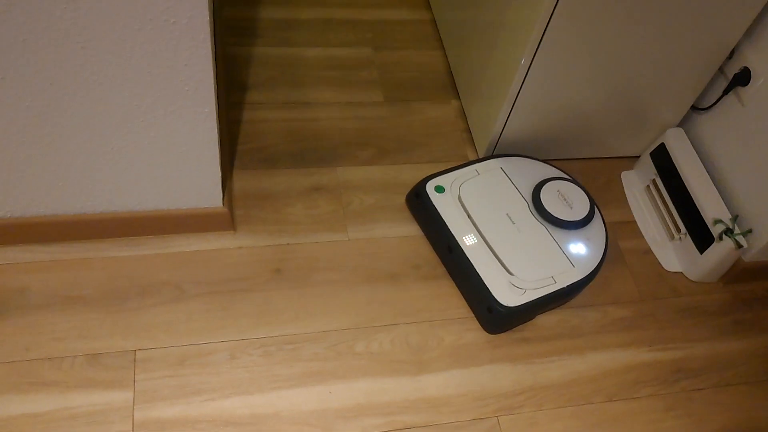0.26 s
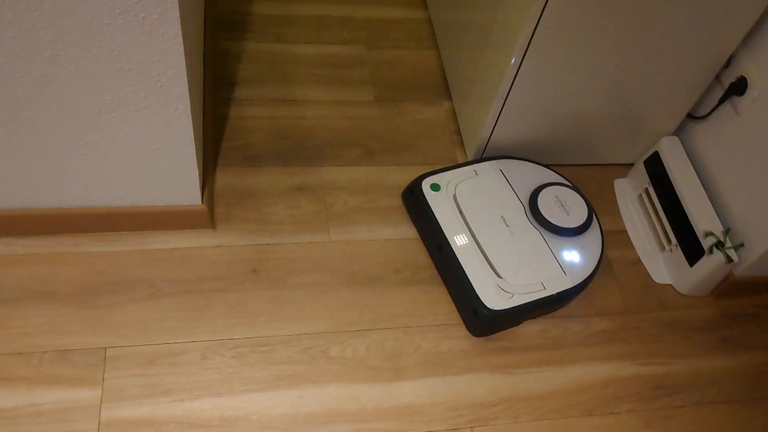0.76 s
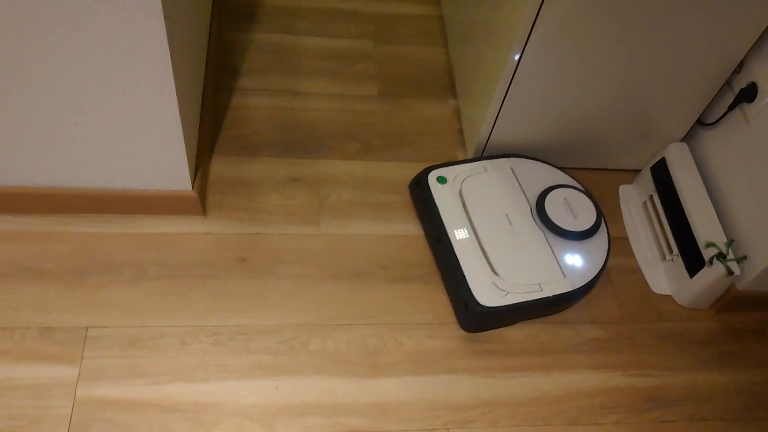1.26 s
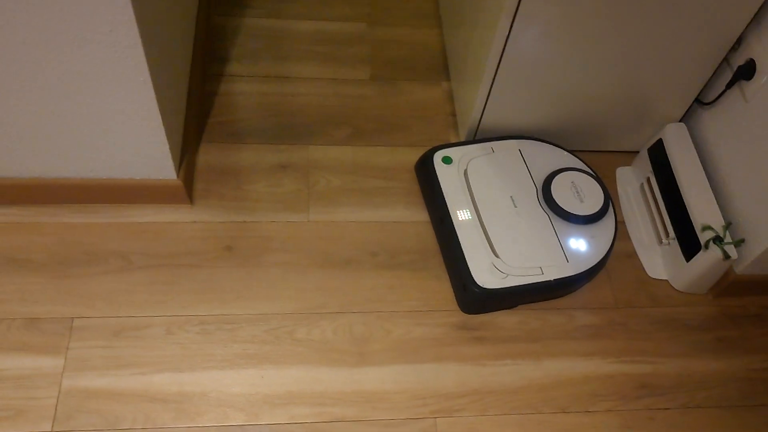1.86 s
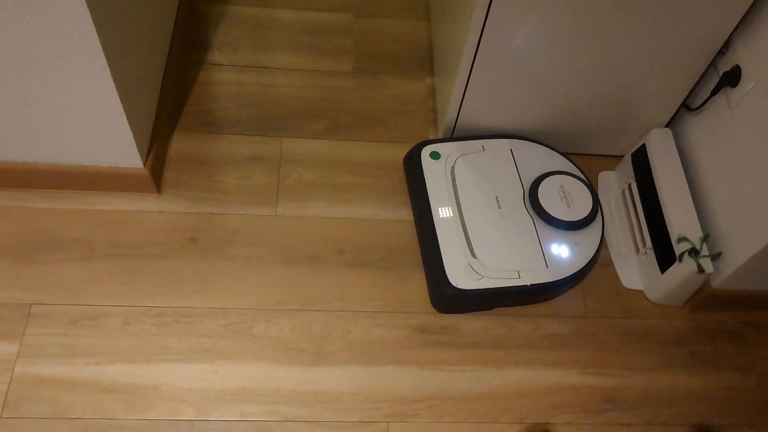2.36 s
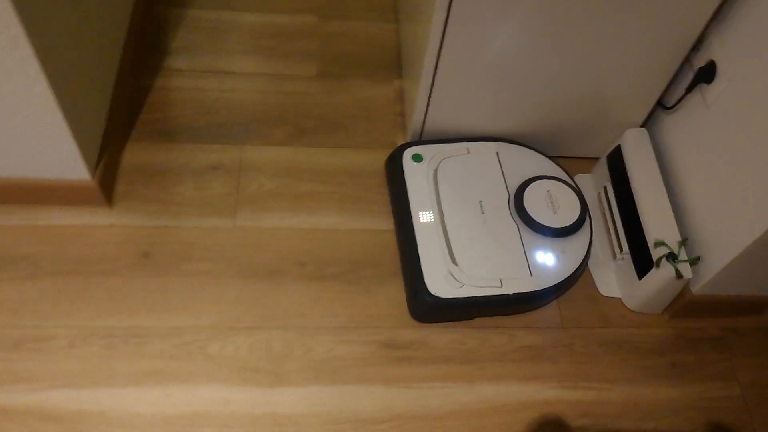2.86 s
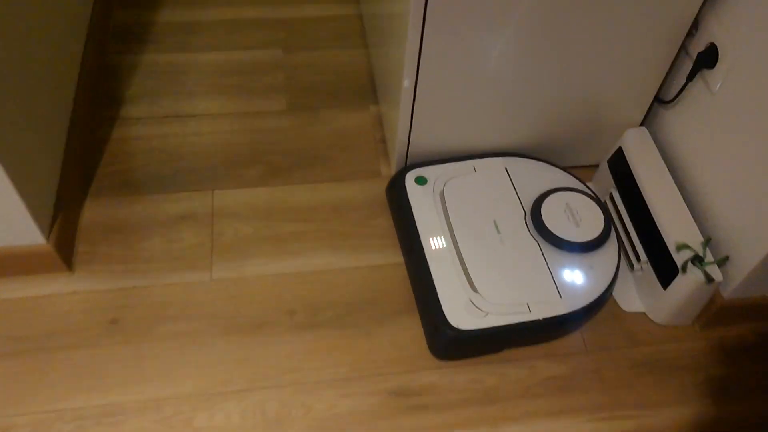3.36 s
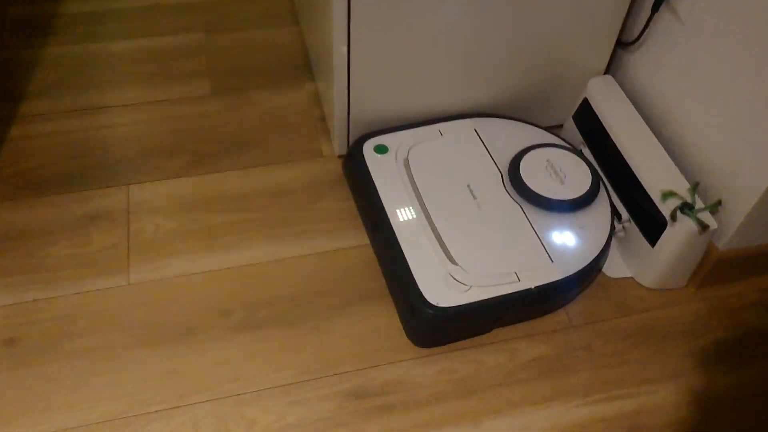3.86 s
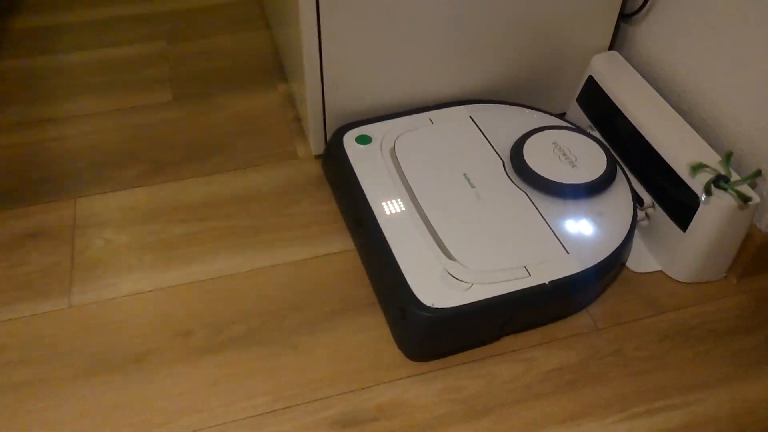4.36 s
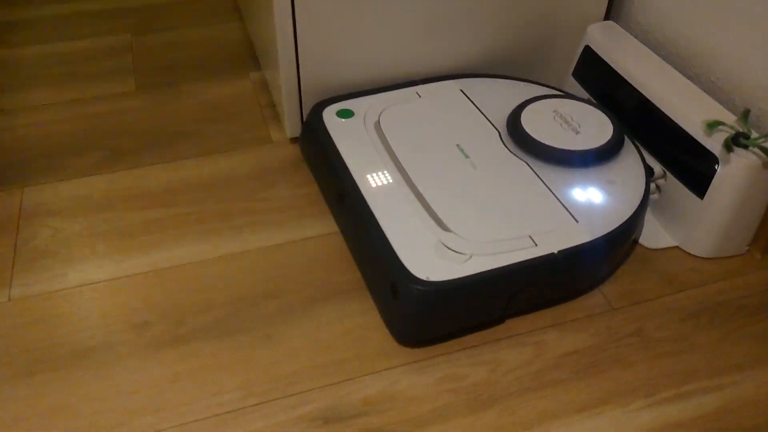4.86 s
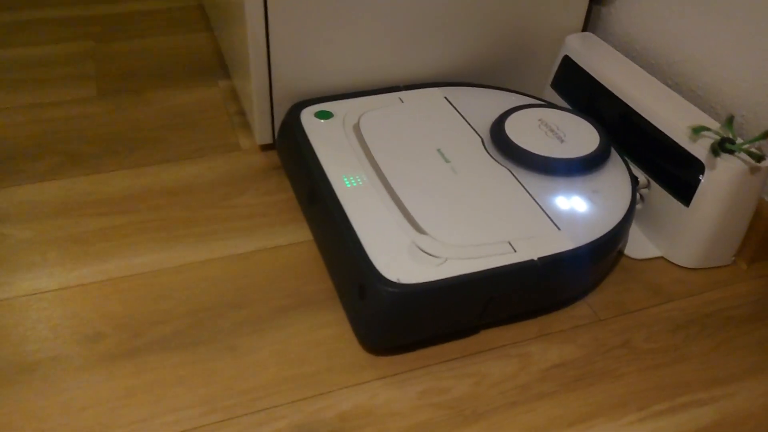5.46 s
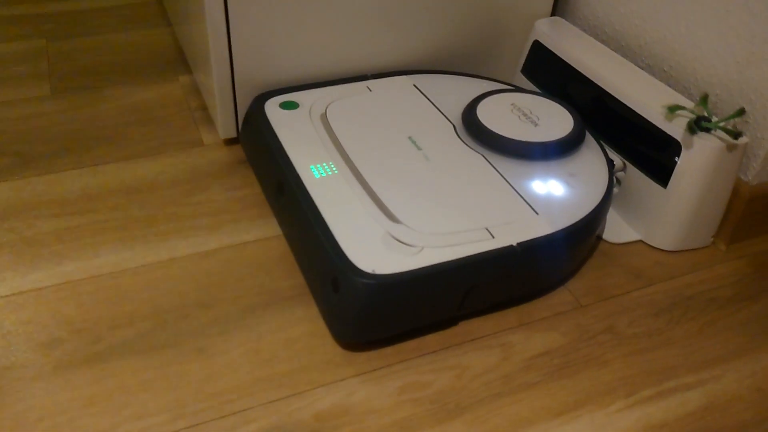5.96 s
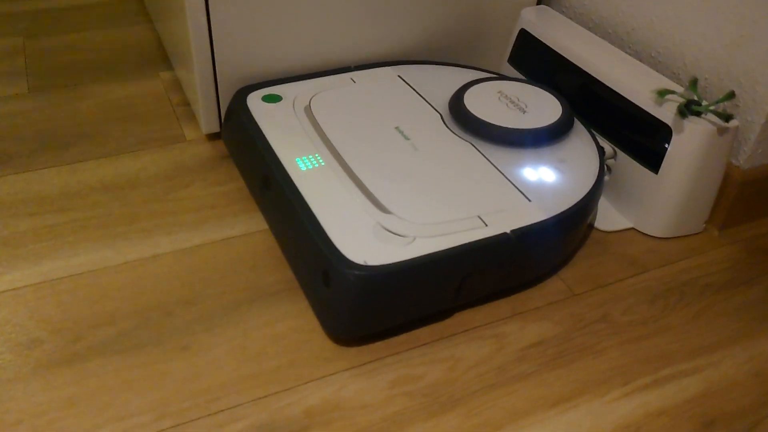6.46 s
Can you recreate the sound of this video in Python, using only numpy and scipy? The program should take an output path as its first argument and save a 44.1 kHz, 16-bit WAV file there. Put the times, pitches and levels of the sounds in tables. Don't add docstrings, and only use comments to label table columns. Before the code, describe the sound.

A robot vacuum idles on a wooden floor with a smooth, low electric hum, thin wavering gear whines and soft hiss. The handheld microphone moves closer, with faint scuffs and small case ticks. The hum almost vanishes around the middle, then returns stronger. Near the end, wheels and boards knock softly and plastic contacts clack in two short bursts, with a brief room echo, while the motor keeps humming.

```python
import sys
import numpy as np
from scipy import signal
from scipy.fft import rfft, irfft, next_fast_len
from scipy.io import wavfile

SR = 44100
rng = np.random.default_rng(int(sys.argv[2]) if len(sys.argv) > 2 else 0)


def to_linear_factor(level_db):
    exponent = np.asarray(level_db, float) / 20
    return 10 ** exponent


def int16_out(signal):
    q = np.round(np.clip(np.atleast_2d(signal).T, -1, 1) * 32767)
    wavfile.write(sys.argv[1], SR, q.astype(np.int16))


N = 296333


def rms_one(x):
    return x / np.sqrt(np.mean(x ** 2) + 1e-20)


def in_time(rows):
    s, *columns = np.transpose(rows)
    return [np.interp(np.arange(N) / SR, s, c) for c in columns]


def at_hz(points, hz):
    table_hz, values = np.array(points).T
    return np.interp(np.log(hz + 1), np.log(table_hz), values)


def bell(s, half_width):
    return np.exp(-((np.arange(N) / SR - s) / half_width) ** 2)


def swell(s, rise, fall):
    return np.where(np.arange(N) < s * SR, bell(s, rise), bell(s, fall))


def drift(rate):
    r = np.exp(-128 * np.pi * rate / SR)
    chance = rng.standard_normal(N // 64 + 2002)
    slow = signal.lfilter([1], [1, -2 * r, r * r], chance)[2000:]
    return np.interp(np.arange(N) / 64, np.arange(len(slow)), rms_one(slow))


def ring(clicks, hz, t60):
    r, w = to_linear_factor(-60 / (t60 * SR)), 2 * np.pi * hz / SR
    return signal.lfilter([0, np.sin(w)], [1, -2 * r * np.cos(w), r * r], clicks + 1e-18)


# pitch in Hz, likeness from 0 to 1.
LIKENESS = [(60, 0.32), (180, 0.65), (550, 1), (1650, 0.8), (4970, 0.072), (15000, 0.018)]


def coloured_noise(spectrum, patchy_db, patch_rate, count, repeating=0):
    size = next_fast_len(N)
    hz = np.fft.rfftfreq(size, 1 / SR)
    first, second = rfft(rng.standard_normal((2, N)) + repeating, size) * to_linear_factor(at_hz(spectrum, hz))
    alike = np.clip(at_hz(LIKENESS, hz), 0, 1)
    pair = np.array([first, alike * first + np.sqrt(1 - alike ** 2) * second])
    lowest_hz, highest_hz = spectrum[0][0], spectrum[-1][0]
    place = (np.log(hz + 1) - np.log(lowest_hz)) * (count - 1) / np.log(highest_hz / lowest_hz)
    place = np.clip(place, 0, count - 1)
    out = 0
    for k in range(count):
        band = np.clip(1 - abs(place - k), 0, 1)
        out = out + to_linear_factor(patchy_db * drift(patch_rate)) * irfft(pair * band, size)[:, :N]
    return rms_one(out)


# time in seconds, level in dB.
NEARNESS = [
    (0.0, -58.5),
    (1.44, -59.5),
    (3.56, -57),
    (4.36, -57),
    (5.02, -55),
    (5.43, -59),
    (5.63, -55.5),
    (6.72, -55.5),
]


def nearness_db():
    near_db, = in_time(NEARNESS)
    return near_db - near_db.mean()


def past_dead_spots(open_db, spots):
    return open_db - sum(depth_db * bell(s, half_width) for s, depth_db, half_width in spots)


# time in seconds, speed in turns per second.
SHAFT = [(0, 95.35), (0.65, 95.39), (1.2, 95.17), (1.65, 95.15), (1.9, 95.27), (2.4, 95.06), (2.9, 95.43),
         (3.4, 95.32), (3.65, 95.49), (4.4, 95.6), (5.12, 96.01), (5.7, 95.5), (6.15, 95.33), (6.38, 95.65),
         (6.72, 95.45)]


def shaft_turns():
    return np.cumsum(in_time(SHAFT)[0]) / SR


# time in seconds, level in dB, left minus right in dB, lag of the left in radians.
HUM = [(0.0, -42.5, -3, 0.66), (0.03, -42.5, -4, 0.67), (1.18, -42.5, -2.5, 0.58), (2.0, -44.5, -1.5, 0.77),
       (2.47, -48.5, 4, 0.52), (2.75, -52.5, 2, 0.87), (2.82, -55.5, 2, 0.93), (2.99, -55, -4, 1),
       (3.18, -56, -8, 0.44), (3.54, -44.5, -3.5, 0.15), (4.06, -41.5, -1, 0.27), (4.23, -41.5, -2.5, 0.43),
       (4.73, -38.5, -3, 0.37), (5.46, -38.5, -2.5, 0.35), (5.5, -40, -2, 0.35), (5.67, -38, -3.0, 0.2),
       (6.7, -38, -3.5, 0.17), (6.72, -38, -4.5, 0.24)]


def motor_hum(turns):
    hum_db, pan_db, lag = in_time(HUM)
    phase = 2 * np.pi * 5 * turns
    level = to_linear_factor(hum_db + 0.5 * drift(3.1) + 0.22 * drift(56.0)) * np.sqrt(2)
    left = to_linear_factor(pan_db / 2) * np.sin(phase - lag / 2)
    right = to_linear_factor(-pan_db / 2) * np.sin(phase + lag / 2)
    return level * np.array([left, right])


def wandering_line(turns, multiple, db, fade_db, slip):
    def at_port():
        level = to_linear_factor(db + fade_db * drift(0.89)) * np.sqrt(2)
        return level * np.sin(2 * np.pi * (multiple * turns + rng.random()) + slip * drift(6.6))
    return np.array([at_port() for port in range(2)])


# multiples of the shaft speed, then their open levels in dB.
WHINE_MULTIPLES = (10, 12, 15, 21, 22)
WHINE_DB = [-61.4, -60.5, -57.8, -58, -57.2]
# time in seconds, depth in dB, half width in seconds.
TENTH_SPOTS = [(0.68, 7.6, 0.1), (0.84, 11.3, 1.2), (1.06, 9.4, 0.29), (1.62, 8.3, 0.11), (2.58, 3.9, 0.09),
               (2.89, 6.6, 0.61), (4.37, 14.0, 0.2), (4.65, 13.3, 0.12), (5.19, 19.7, 0.37),
               (5.47, 8.5, 0.07), (5.97, 10.5, 0.23), (6.36, 6.2, 0.09), (6.63, 7.2, 0.24)]
TWELFTH_SPOTS = [(0.19, 2.0, 0.37), (1.2, 7.0, 0.39), (2.37, 4.6, 0.09), (2.39, 9.4, 0.69),
                 (3.16, 7.1, 0.13), (3.41, 6.0, 0.12), (4.02, 6.9, 0.14), (4.51, 5.6, 0.06),
                 (4.77, 18.5, 0.31), (5.24, 12.9, 0.06), (5.54, 12.5, 0.2), (5.98, 9.8, 0.21),
                 (6.57, 13.6, 0.29)]
FIFTEENTH_SPOTS = [(-0.3, 10.9, 0.87), (0.29, 5.6, 0.05), (0.87, 3.8, 0.08), (1.35, 7.8, 0.07),
                   (1.84, 10.6, 0.75), (1.85, 10.2, 0.11), (2.37, 9.0, 0.17), (3.64, 13.7, 0.22),
                   (4.22, 12.4, 0.07), (4.7, 5.3, 0.25), (5.54, 8.1, 0.17), (5.96, 11.2, 0.16),
                   (6.67, 18.1, 0.57)]
TWENTY_FIRST_SPOTS = [(0.32, 10.8, 0.5), (1.09, 7.4, 0.13), (1.59, 9.4, 0.17), (1.99, 3.5, 0.11),
                      (2.33, 10.3, 0.16), (2.84, 10.1, 0.23), (3.14, 10.2, 0.06), (3.33, 20.2, 0.07),
                      (3.68, 13.0, 0.06), (4.53, 5.5, 0.64), (5.15, 11.5, 0.18), (5.46, 6.4, 0.05),
                      (6.47, 8.0, 0.47)]
TWENTY_SECOND_SPOTS = [(0.29, 16.1, 0.39), (1.49, 4.8, 0.29), (2.1, 3.9, 0.07), (2.81, 9.7, 0.46),
                       (3.32, 5.2, 0.05), (3.62, 5.0, 0.07), (4.02, 6.1, 0.09), (4.24, 7.0, 0.29),
                       (4.63, 11.3, 0.12), (5.06, 11.1, 0.19), (5.28, 13.7, 0.06), (6.25, 5.1, 0.05),
                       (6.89, 6.7, 1.13)]


def gear_whine(turns):
    spots = TENTH_SPOTS, TWELFTH_SPOTS, FIFTEENTH_SPOTS, TWENTY_FIRST_SPOTS, TWENTY_SECOND_SPOTS
    levels_db = map(past_dead_spots, WHINE_DB, spots)
    return sum(wandering_line(turns, k, db, fade_db=0.4, slip=0.15)
               for k, db in zip(WHINE_MULTIPLES, levels_db))


# multiple of the shaft speed, level in dB.
WEAK_GEARS = [(6, -76.5), (8, -75), (9, -78), (11, -77), (13, -77.5), (14, -74), (16, -74), (17, -76),
              (18, -74), (19, -71.5), (20, -73.5), (23, -75.5), (26, -74.5), (34, -76.5), (35, -71.5),
              (36, -96), (39, -81), (40, -89), (41, -99), (42, -75), (44, -84)]


def weak_gear_lines(turns):
    gears = sum(wandering_line(turns, k, db, fade_db=4.0, slip=0.057 * k + 0.12) for k, db in WEAK_GEARS)
    return to_linear_factor(0.21 * nearness_db()) * gears


DRONE_DB = [-63.5, -62]
# time in seconds, depth in dB, half width in seconds.
DRONE_DEAD_SPOTS = [
    [(0.4, 2.7, 0.58), (3.5, 2, 0.093), (4.3, 1.6, 0.31), (5.45, 6.1, 0.27), (6.4, 8, 0.17)],
    [(0.4, 4.4, 0.76), (4.3, 18, 0.5), (5.4, 8.3, 0.47), (6.5, 11, 0.57)],
]


def second_motor():
    third_db, fourth_db = map(past_dead_spots, DRONE_DB, DRONE_DEAD_SPOTS)
    turns = np.cumsum(80.75 + 0.21 * drift(3.9)) / SR
    third = to_linear_factor(third_db) * np.sin(2 * np.pi * 3 * turns)
    fourth = to_linear_factor(fourth_db) * np.sin(2 * np.pi * 4 * turns)
    return np.sqrt(2) * (third + fourth)


def tooth_pattern(turns, slip_turns):
    out, power = 0, 0
    for pattern in rng.standard_normal((4, 2, 462)):
        place = (turns + slip_turns * drift(8.0)) % 1 * 461
        share = drift(2.17)
        out = out + share * pattern[:, np.round(place).astype(int)]
        power = power + share ** 2
    return out / np.sqrt(power)


# time in seconds, rise in seconds, fall in seconds, rustle in dB, thump in dB.
SCUFFS = [(0.05, 0.12, 0.12, -55, -71), (1.01, .04, .04, -66, -77), (1.378, 0.054, .06, -66, -63),
          (1.577, 0.053, 0.072, -53.5, -75), (2.385, .01, 0.039, -61, -58), (3.25, 0.03, .03, -55, -71),
          (3.37, 0.014, .05, -61, -75), (3.886, 0.0043, 0.034, -53.5, -54.5),
          (4.68, 0.056, 0.087, -65, -72), (4.826, 0.005, 0.024, -58, -50), (4.862, .003, 0.022, -55, -55.5),
          (5.082, 0.0088, 0.056, -67, -57), (5.482, 0.078, 0.091, -60, -51),
          (5.604, 0.0028, 0.026, -52, -52), (5.94, 0.015, 0.092, -67, -51.5)]


def scuffs():
    rustle = sum(to_linear_factor(db) * swell(s, rise, fall) for s, rise, fall, db, _ in SCUFFS)
    thump = sum(to_linear_factor(db) * swell(s, rise, fall) for s, rise, fall, _, db in SCUFFS)
    return rustle, thump


# pitch in Hz, level in dB per Hz.
RUMBLE = [(65, -36), (110, -27.5), (188, -14.5), (237, -14), (409, -15), (444, -16), (476, -14),
          (531, -11.5), (600, -13.5), (670, -18), (1070, -20.5), (1130, -23.5), (1630, -17), (2060, -18),
          (2300, -19.5), (2900, -25.5), (3770, -70), (6380, -120)]


def rumble(thump):
    level = np.hypot(to_linear_factor(-58.5 + 0.016 * nearness_db()), thump)
    return level * coloured_noise(RUMBLE, patchy_db=2.16, patch_rate=0.44, count=10)


# pitch in Hz, level in dB per Hz.
HISS = [(1530, -41), (2600, -26), (2900, -4.5), (3230, 1.5), (3550, -1.5), (3860, 0.5), (4140, 1),
        (5160, -8), (6150, -12), (6700, -26), (7200, -20.5), (9360, -33), (15800, -120)]


def gear_hiss(turns, teeth, thump):
    tooth_load = 1 + 0.043 * np.cos(2 * np.pi * turns) + 0.028 * np.cos(4 * np.pi * turns)
    level = np.hypot(to_linear_factor(-56.5 + nearness_db()), to_linear_factor(-0.5) * thump)
    noise = coloured_noise(HISS, patchy_db=2.5, patch_rate=14.0, count=24, repeating=0.61 * teeth)
    return level * tooth_load * noise


# pitch in Hz, level in dB per Hz.
AIR = [(4000, 0.5), (6800, -2), (6970, -11), (7690, 2), (10400, 2.5), (11600, -1.5), (12100, 2), (12700, 2),
       (13400, -0.5), (14300, 3), (14800, 1), (15200, -2), (15700, -1.5)]


def air(teeth, rustle):
    level = np.hypot(to_linear_factor(-64 + 0.32 * nearness_db()), rustle)
    return level * coloured_noise(AIR, patchy_db=0.5, patch_rate=0.42, count=24, repeating=1.14 * teeth)


# pitch in Hz, level in dB per Hz.
HANDLING = [(12, -43), (20, -23), (125, -19.5), (170, -21), (280, -61)]


def handling():
    level = to_linear_factor(-74 + 2.04 * nearness_db())
    return level * coloured_noise(HANDLING, patchy_db=2.0, patch_rate=2.4, count=3)


SWELL_MULTIPLES = (20, 9, 13, 19, 16, 44, 34, 42, 44, 41, 33, 44, 39, 35, 35, 35, 39, 42, 42, 40, 42, 16,
                   39, 19, 16, 42, 17, 20, 13, 35, 20, 39, 23, 66, 42, 41, 20, 42, 39, 17, 41, 39, 42, 41)
# time in seconds, half width in seconds, level in dB.
GEAR_SWELLS = [(.2, .25, -70), (2.05, .3, -71.5), (1.05, .3, -75), (.8, .2, -70), (1.5, .15, -72),
               (1.7, .2, -73), (.6, 1, -73), (.75, 0.2, -68), (1.08, 0.18, -67.5), (1.5, 0.18, -74),
               (2.15, 0.15, -72), (2.4, 0.23, -67.5), (2.75, 0.36, -70), (5.2, .2, -67), (5.7, 0.18, -69),
               (6.4, 0.32, -73), (6.45, 0.28, -69), (6.5, 0.22, -69),
               (2.34, 0.079, -62), (3.27, 0.1, -75), (3.38, 0.64, -67.5), (3.45, 0.21, -66), (3.65, 0.15, -66),
          (3.95, 0.27, -67), (4.06, 0.16, -68), (4.06, 0.053, -63), (4.29, 0.16, -68.5), (4.38, 0.11, -69),
          (4.69, 0.28, -72), (4.72, 0.41, -67.5), (4.76, 0.09, -78), (4.78, 0.42, -65), (4.81, 0.11, -68.5),
          (4.9, 0.53, -77), (5.19, 0.12, -62.5), (5.35, 0.27, -64), (5.6, 0.094, -62), (5.6, 0.1, -68),
          (5.67, 0.06, -69.2), (5.69, 0.2, -70), (5.83, 0.17, -67), (6.01, 0.16, -66), (6.08, 0.09, -62),
          (6.26, 0.25, -65)]


def gear_swells(turns):
    left_lead = np.array([[1.1], [0]])
    out = 0
    for k, (s, half_width, db) in zip(SWELL_MULTIPLES, GEAR_SWELLS):
        phase = 2 * np.pi * (k * turns + rng.random()) + 0.8 * drift(7.0)
        level = to_linear_factor(db + 1.5 + 2.5 * drift(21.0)) * bell(s, half_width) * np.sqrt(2)
        out = out + level * np.sin(phase + left_lead)
    return out


# pitch in Hz, width in Hz, level in dB, time in seconds, half width in seconds.
WHISTLES = [(11000, 67, 4, 5.9, .7), (8220, 130, 2, 6.1, 0.62), (10700, 34, 2, 5.2, 0.25),
            (8000, 93, 3, 5.3, 0.65), (9300, 130, -8, 1.5, 1.5), (9980, 370, -1, 3.9, 1.5),
            (10840, 31, 2, 4.5, 0.61), (13400, 45, 4, 5.5, 1.1), (13700, 120, -1, 4.2, 1.2),
            (15550, 68, 1, 5.6, .4), (13900, 40, -7, .8, 0.88), (6200, 130, -1.5, 0.95, 1.5),
            (6270, 88, 3.5, 5.5, .8), (4210, 110, 9, 1.7, 1.3), (3785, 240, 18, 5.22, 0.61),
            (3290, 110, 16.5, 5.25, 0.58), (4130, 69, 7, 5.2, 0.21), (3298, 145, 21.5, 7.3, 1.5),
            (805, 380, 6.5, 3.83, 0.18), (10100, 60, 4, 4.7, .2), (15500, 60, 1, .6, .08),
            (13600, 50, 0, .7, .5), (9300, 50, 1, 1.4, .5), (10050, 50, -1, 2.2, .6),
            (9500, 500, 3, 6.08, .015), (9400, 500, 2, 5.925, .015)]


def whistles():
    out, white = 0, rng.standard_normal((2, N))
    for hz, width_hz, db, s, half_width in WHISTLES:
        b, a = signal.iirpeak(hz, hz / (1.37 * width_hz), fs=SR)
        sung = rms_one(signal.lfilter(b, a, signal.lfilter(b, a, white)))
        level = to_linear_factor(db - 97.5 + 0.92 * drift(2.7)) * bell(s, half_width)
        out = out + level * np.sqrt(width_hz) * sung
    return out


# time in seconds, peak in dB, level in dB of the full-range burst relative to the
# part above 6 kHz.
TICKS = [(.305, -65, -20), (.377, -60, -20), (1.8, -63, -20), (1.862, -61, -20), (2.14, -64, -18),
         (4.816, -62, -12), (4.8272, -55, -23), (4.838, -62, -14), (4.8885, -65, -17), (4.911, -62, -8),
         (5.9189, -64, -10), (6.079, -74, -6), (1.139, -55.5, -12), (2.3825, -66, -20), (3.2594, -66, -14),
         (3.3794, -63, -10), (3.8856, -49.5, -29), (4.1067, -66, -12), (4.1278, -62, -15),
         (4.8254, -51, -20), (4.8617, -51.5, -6), (5.0004, -66, -6), (5.0764, -61, -6), (5.4879, -58, -14),
         (5.497, -61, 5), (5.603, -52, -18), (6.2891, -70, -6)]


def ticks():
    length = 2048
    out, age = np.zeros((2, N + length)), np.arange(length) / SR
    high_pass = signal.butter(2, 6000, "high", fs=SR, output="sos")
    fading = np.exp(-age / 0.0014) + 0.084 * np.exp(-age / 0.0099)
    for s, peak_db, low_db in TICKS:
        burst = rng.standard_normal((2, length)) * fading
        burst[:, 0] = 2.5
        bright = signal.sosfilt(high_pass, burst)
        start = round(s * SR)
        out[:, start:start + length] += to_linear_factor(peak_db + 11.5) * (bright + to_linear_factor(low_db) * burst)
    return out[:, :N]


# time in seconds, peak in dB, brightness in dB per octave.
CLACKS = [(3.8874, -46, -6), (4.582, -42, 1), (4.714, -42, -1), (4.8191, -47, 0), (4.8255, -57, 12),
          (4.8332, -46, -3), (4.8625, -57, 12), (4.911, -56, 10), (5.003, -52, 6), (5.0988, -46, -4),
          (5.4296, -34.5, 1), (5.4306, -40, 0), (5.4442, -40, 0), (5.449, -35, 6), (5.4507, -41, 3),
          (5.4525, -43, 4), (5.4555, -43, 5), (5.4587, -45, 7), (5.4617, -47, 8), (5.4665, -45, 4),
          (5.4704, -46, 1), (5.4744, -46, 0), (5.4984, -45, -1), (5.5135, -46, -4), (5.5175, -44, -2),
          (5.538, -48, 0), (5.548, -47, 0), (5.8686, -43, -2), (5.6045, -49, 8), (5.919, -35, -3),
          (5.9274, -36.5, 0), (5.9378, -34, -1), (5.9397, -35, 0), (5.9472, -41, 3), (5.9538, -45, 0),
          (6.0153, -41, -2), (6.079, -47, 5), (6.291, -48, 6)]
# pitch in Hz, level in dB, seconds to fall by 60 dB.
SHELL = [(1740, 0, .02), (2110, -5, .018), (2800, -6, .006), (3300, 6, .016), (3800, 0, .005),
         (4550, -6, .006), (5450, -10, .006), (6240, -20, .004)]


def clacks():
    s, peak_db, bright_db = np.transpose(CLACKS)
    at = np.round((s + 0.0005) * SR).astype(int)
    chance_db = rng.standard_normal((len(s), len(SHELL)))
    out = 0
    for k, (hz, level_db, t60) in enumerate(SHELL):
        clicks = np.zeros(N)
        tilt_db = bright_db * np.log2(hz / 2000)
        clicks[at] = -to_linear_factor(peak_db + level_db + tilt_db - 4.5 + chance_db[:, k])
        bounce = 0.077 * np.roll(clicks, 84)
        out = out + ring(clicks + bounce, hz, t60)
    out = signal.sosfilt(signal.butter(1, 800, "high", fs=SR, output="sos"), out)
    return signal.sosfilt(signal.butter(8, 6700, fs=SR, output="sos"), out)


# time in seconds, peak in dB, pitch in Hz, seconds to fall by 60 dB.
KNOCKS = [(4.655, -58, 70, 0.13), (5.071, -46, 1220, 0.039), (5.097, -42, 1755, .03),
          (5.3, -51, 1190, 0.039), (5.428, -47, 717, 0.059), (5.502, -45.5, 174, 0.048),
          (3.89, -53, 990, 0.054), (5.605, -52, 733, 0.14), (5.622, -45, 900, 0.029),
          (5.715, -58, 91, 0.11), (5.918, -48, 692, 0.067), (5.918, -47, 1690, 0.06),
          (6.042, -48, 193, 0.045)]


def knocks():
    length = 8192
    out, age = np.zeros(N + length), np.arange(length) / SR
    for s, peak_db, hz, t60 in KNOCKS:
        shape = (1 - np.exp(-age * hz / 0.33)) * to_linear_factor(-60 * age / t60)
        start = round(s * SR)
        out[start:start + length] += to_linear_factor(peak_db) * shape / shape.max() * np.sin(2 * np.pi * hz * age)
    return out[:N]


def room(x):
    age = np.arange(SR // 2) / SR
    tail = rng.standard_normal((2, len(age))) * to_linear_factor(-60 * age / 0.3)
    tail = tail * (age > 0.004)
    tail = signal.lfilter([0.5], [1, -0.5], tail) / np.sqrt(np.sum(tail[0] ** 2))
    return to_linear_factor(-11.5) * signal.fftconvolve(tail, x[None], axes=1)[:, :N]


# pitch in Hz, left minus right in dB.
LEFT_PORT = [(110, -1), (180, -5.5), (400, -5), (700, -4), (1200, -2.5), (2700, -1.5), (3300, -9.5),
             (3800, 0), (4800, -5), (5500, -27.5), (7000, -14), (8300, -22.5), (9000, -52), (10000, -14.5),
             (12000, -12), (15500, -48)]


def left_port(x):
    hz = np.fft.rfftfreq(1024, 1 / SR)
    cepstrum = irfft(np.log(to_linear_factor(at_hz(LEFT_PORT, hz))))
    cepstrum[1:512] *= 2
    cepstrum[513:] = 0
    return signal.fftconvolve(x, irfft(np.exp(rfft(cepstrum))))[:N]


def scene():
    turns = shaft_turns()
    hum = motor_hum(turns)
    tones = gear_whine(turns) + weak_gear_lines(turns) + second_motor()
    teeth = tooth_pattern(turns, slip_turns=0.004)
    rustle, thump = scuffs()
    noise = rumble(thump) + gear_hiss(turns, teeth, thump) + air(teeth, rustle) + handling()
    blows = clacks() + knocks()
    rest = tones + noise + gear_swells(turns) + whistles() + ticks() + blows + room(blows)
    rest[0] = left_port(rest[0])
    return rest + hum


def band_limit(x):
    return signal.sosfilt(signal.butter(12, 15810, fs=SR, output="sos"), x)


def record(dry):
    return band_limit(dry)


dry = scene()
out = record(dry)
int16_out(out)
```